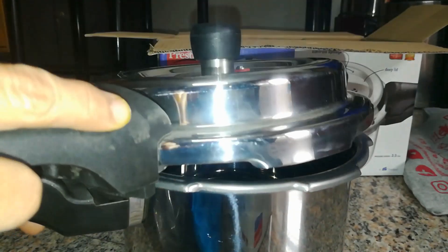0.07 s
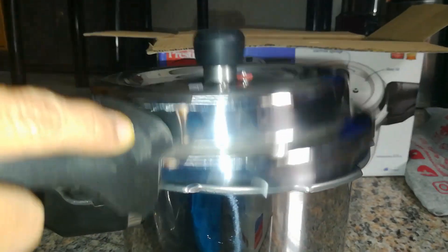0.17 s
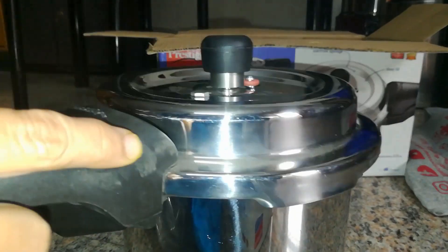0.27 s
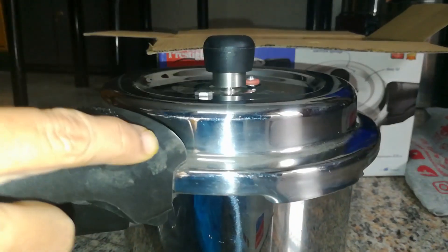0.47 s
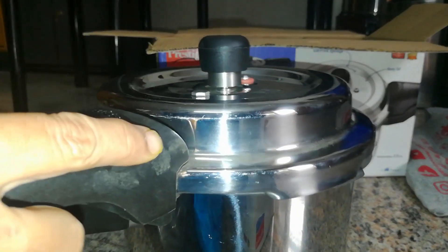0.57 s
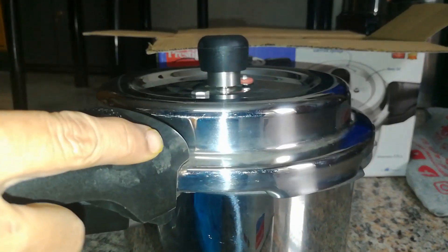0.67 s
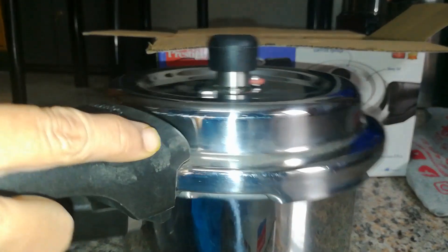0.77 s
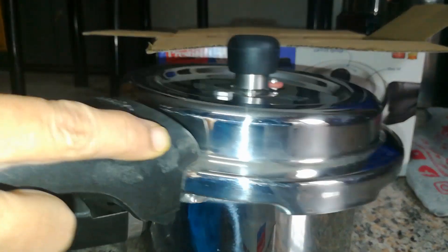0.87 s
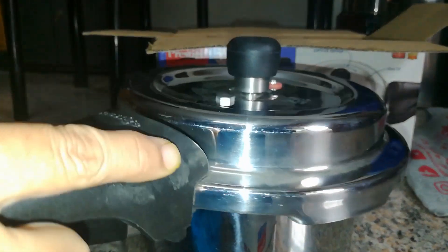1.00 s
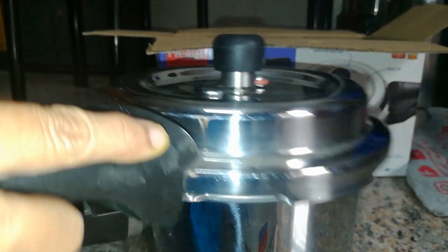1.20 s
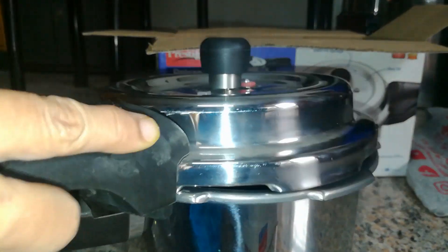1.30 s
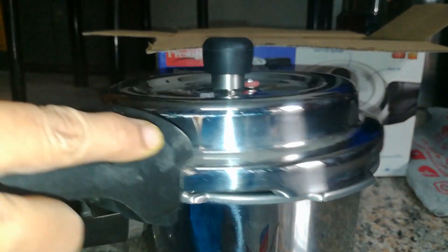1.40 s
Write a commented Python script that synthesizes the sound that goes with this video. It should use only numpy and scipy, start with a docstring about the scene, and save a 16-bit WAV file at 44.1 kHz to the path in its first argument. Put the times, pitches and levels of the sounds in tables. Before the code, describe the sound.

Loud metallic clank of a lid landing on a steel pot, followed by short scrapes and knocks

```python
"""A steel lid, ringing faintly from the start, is set down on a pressure cooker with one loud clank.
Held by its handle, it is then shifted: the rims scrape in runs of tiny slips, catch and knock.
Knocks ring the steel as clear tones in a crowd of close ones; they also make the hollow pot thump.
A small room adds a tail; coloured noise makes the low rumble of handling and the still air underneath."""
import sys
import numpy as np
from scipy import signal
from scipy.fft import rfft, irfft
from scipy.io import wavfile
from scipy.ndimage import uniform_filter1d

SR = 44100
rng = np.random.default_rng(int(sys.argv[2]) if len(sys.argv) > 2 else 0)


def to_wav(s):
    """Save 16-bit WAV."""
    ch = np.atleast_2d(s).T  # columns
    pcm = np.round(np.clip(ch, -1, 1) * 32767)  # PCM
    wavfile.write(sys.argv[1], SR, pcm.astype(np.int16))


N = 63945
RING_S = 0.7  # length worked out for every ring and thump
AGE = np.arange(int(RING_S * SR)) / SR  # seconds since the contact

# the crowd of close modes between the clear ones:
# (frequency [Hz], relative level per Hz [dB], left over right [dB])
CROWD_COLOUR = [(209, -24, -0.5), (383, -1.5, -15), (590, -10, 26.5), (740, -3.5, 6.5), (1160, -2, 3),
                (2180, 0, 1), (3300, 0, 3.5), (4730, 4.5, 8), (5940, 5.5, 9), (6100, 7, -2.5),
                (7300, 3, -2.5), (9000, 4.5, -8.5), (10440, 0.5, -9), (12560, -5.5, -10), (14300, -14, 0.5)]
# how alike the two ears hear it: (frequency [Hz], left-right correlation [0 to 1])
EAR_LIKENESS = [(100, .97), (250, .92), (700, .7), (1400, .55), (3000, .25), (8000, .1)]

THUMP_T60_S, THUMP_ATTACK_S = 0.24, 0.0045
LANDING_MODES_DB, SEATED_MODES_DB = 2.5, -2  # trims of the clear modes


def knocks(common):
    """Rim hits rim: knocks ring the steel and thump the pot, while bumps add only a thump."""
    # rim meets rim: (time [s], ring level [dB], brightness [dB per octave], thump level [dB],
    # thump pitch [Hz])
    rim_knocks = [(0.2126, -3.5, -2.4, -17, 292.7), (0.2166, -14.5, 10.5, -23, 228.5),
                  (0.242, -22.5, -4, -34, 308.5), (0.541, -33, -0.5, -65, 263),
                  (0.692, -42, -1, -32, 240.3), (0.773, -40.5, -2, -35, 284), (0.81, -21.5, -2.5, -31, 270),
                  (0.834, -24, -3.5, -47, 216), (0.963, -18.5, -0.5, -23.5, 235),
                  (1.016, -35.5, -3.5, -33, 234.5), (1.175, -18.5, -0.4, -28.5, 274.2),
                  (1.187, -25.5, -1, -33, 272), (1.216, -22, 1.8, -30.5, 218.5),
                  (1.258, -26.5, -2.5, -45, 220.3), (1.283, -31.5, -2.5, -34, 226)]
    # low thumps of lid on pot, alone or under a knock: (time [s], level [dB], pitch [Hz],
    # time to fall 60 dB [s])
    low_bumps = [(-0.01, -34.5, 230, 0.14), (0.345, -35.5, 287.6, 0.12), (0.424, -44.5, 284.2, 0.44),
                 (0.514, -32.5, 269, 0.14), (1.101, -38, 246, 0.086), (1.140, -27.5, 253.3, 0.1),
                 (1.257, -18, 218.4, 0.11)]
    seated_from_s = 0.5  # from here on the lid sits on the rim
    out = np.zeros((2, N))
    for s, ring_db, bright_db, thump_db, hz in rim_knocks:
        seated = s > seated_from_s
        modes_db = SEATED_MODES_DB if seated else LANDING_MODES_DB
        ring = steel_ring(common, bright_db, pot_modes(seated), modes_db)
        add(out, s, from_db(ring_db) * ring + from_db(thump_db) * thump(hz, THUMP_T60_S))
    for s, db, hz, t60 in low_bumps:
        add(out, s, from_db(db) * thump(hz, t60))
    return out


def steel_ring(common, bright_db, modes, modes_db):
    """One contact: a crack, a crowd of close modes with the room's tail, and the clear modes on top."""
    # how long the crowd rings: (frequency [Hz], time to fall 60 dB [s])
    crowd_decay = [(400, 0.11), (1500, 0.26), (4500, 0.19), (9000, 0.12), (15000, 0.18)]
    same_ring = 0.73  # share of the ring's power that is alike wherever the rim is struck
    crowd_db, mode_scatter_db = -3, 2.3
    crack_db, crack_s = 0.5, 0.013
    room_db, room_t60_s, room_dull_db = -14, 0.43, -0.6  # the tail is duller: dB per octave

    hz = np.fft.rfftfreq(len(AGE), 1 / SR)
    mixed = np.sqrt(same_ring) * common + np.sqrt(1 - same_ring) * crowd_of_modes()
    crowd = from_db(crowd_db) * rfft(mixed) * tilt(hz, bright_db)
    crowd = crowd * panned(at_hz(CROWD_COLOUR, hz, axis=2))
    crack = from_db(crack_db) * np.exp(-AGE / crack_s)
    room = from_db(room_db) * dying(room_t60_s)

    # overlapping bands, each dying at its own pace
    centres, t60s = np.transpose(crowd_decay)
    out = 0
    for band, centre, t60 in zip(np.eye(len(centres)), centres, t60s):
        share = np.interp(np.log(hz + 1), np.log(centres), band)
        dull_room = tilt(centre, room_dull_db) * room
        out = out + irfft(crowd * share, len(AGE)) * np.sqrt(crack ** 2 + dying(t60) ** 2 + dull_room ** 2)

    for mode_hz, db, t60 in modes:
        # the less alike the ears are, the further apart their phases
        apart = np.arccos(np.clip(at_hz(EAR_LIKENESS, mode_hz), 0, 1)) * rng.choice([-1, 1])
        phase = 2 * np.pi * rng.random() + np.array([[0], [apart]])
        scatter_db = mode_scatter_db * rng.standard_normal()
        gain = from_db(db + modes_db + scatter_db) * tilt(mode_hz, bright_db)
        sides = panned(at_hz(CROWD_COLOUR, mode_hz, axis=2))[:, None]
        out = out + gain * sides * dying(t60) * np.sin(2 * np.pi * mode_hz * AGE + phase)
    return out


def crowd_of_modes():
    """Countless close modes, bunched into stronger and weaker clusters."""
    cluster_db, cluster_hz = 5, 45.54  # how uneven the clusters are and how far apart
    hz = np.fft.rfftfreq(len(AGE), 1 / SR)
    steps = rng.standard_normal(len(hz))
    uneven = np.interp(hz / cluster_hz, np.arange(len(steps)), np.clip(steps, -2, 2))
    spectrum = rfft(noise(CROWD_COLOUR, len(AGE)))
    return rms_one(irfft(spectrum * from_db(cluster_db * uneven), len(AGE)))


def pot_modes(seated):
    """The clear modes of lid and pot as the lid lands, or once it sits on the rim."""
    # (frequency [Hz], relative level landing [dB], relative level seated [dB], time to fall 60 dB [s])
    clear_modes = [(715, -29, -28, .17), (1090, -29, -32, .35), (1290, -22, -19.5, .25),
                   (1616, -18, -15, .22), (1855, -20, -29, .2), (2358, -21.5, -28, .3),
                   (3000, -28, -23, .25), (3150, -20, -24, .22), (3230, -27, -32, .35),
                   (3402, -24, -28, .22), (3590, -30, -23, .22), (3738, -18, -19, .21),
                   (4510, -25, -19, .33), (4670, -18.5, -24, .23), (4828, -23, -17, .27),
                   (4890, -22, -19, .23), (5043, -19, -27, .2), (5557, -17, -18, .28),
                   (5590, -16.5, -21, .2), (5875, -22, -25, .27), (8088, -21, -25, .17),
                   (8955, -21, -26, .19), (9408, -21, -28, .18), (9726, -21, -27, .18),
                   (10137, -21, -28, .2), (11840, -24, -30, .2)]
    return [(hz, seated_db if seated else landing_db, t60)
            for hz, landing_db, seated_db, t60 in clear_modes]


def tilt(hz, bright_db):
    """Each contact has its own brightness: dB per octave around 5 kHz, constant below 500 Hz."""
    return from_db(bright_db * np.log2(np.maximum(hz, 500) / 5000))


def thump(hz, t60):
    """The lid bounces on the air and gasket of the pot: a short low note."""
    hollow_db = -12.5  # against the note, in a thump of the usual length
    note = np.sqrt(2) * np.sin(2 * np.pi * hz * AGE) * dying(t60)
    body = note + from_db(hollow_db) * t60 / THUMP_T60_S * hollow()
    attack = 1 - np.exp(-AGE / THUMP_ATTACK_S)
    return body * attack * panned(db=1.2)[:, None]


def hollow():
    """The dense low resonances of pot and room: dying low noise."""
    # (frequency [Hz], relative level [dB])
    hollow_colour = [(60, -27), (150, -19.5), (205, 11), (300, 9.5), (360, -28), (900, -51)]
    return noise(hollow_colour, len(AGE)) * dying(t60=0.51)


def scrape(count=3):
    """Rim slips on rim in a run of uneven clicks; each spot of the rim rings the steel in its own way."""
    # how hard the rims rub: (time [s], level [dB])
    rubbing = [(0.5, -56.5), (0.549, -39.5), (0.57, -90), (0.69, -65.5), (0.74, -42), (0.79, -28.5),
               (0.825, -23), (0.85, -29), (0.868, -60), (0.932, -37), (0.955, -58), (1.03, -41),
               (1.12, -49), (1.165, -31), (1.19, -28.5), (1.225, -27.5), (1.27, -42), (1.37, -50),
               (1.41, -54), (1.435, -43)]
    slips_per_s, slip_spread_db = 420, 2.2
    bright_db, hollow_db, modes_db = -1.7, -17.5, -0.5
    spot_s = 0.022  # the contact moves on to the next spot this often, round and round

    sizes = from_db(slip_spread_db * np.minimum(rng.exponential(1, N), 3)) * rng.choice([-1, 1], N)
    happens = rng.random(N) < slips_per_s / SR
    slips = rms_one(sizes * happens) * level(rubbing)
    spot = (np.arange(N) / SR // spot_s) % count
    out = 0
    for k in range(count):
        ring = steel_ring(crowd_of_modes(), bright_db, pot_modes(seated=True), modes_db)
        body = rms_one(ring + from_db(hollow_db) * hollow()) / np.sqrt(len(AGE))
        # every slip at this spot sets off its ring
        out = out + signal.fftconvolve((slips * (spot == k))[None], body, axes=1)[:, :N]
    return out


def lifted_lid(common):
    """Held clear of the pot, the lid rings on from an earlier touch with notes of its own."""
    # (frequency [Hz], relative level [dB])
    lid_notes = [(1077, -24), (1312, -17), (2880, -22), (3005, -19), (3228, -21), (4247, -19)]
    start_s, lid_db, t60_s = -0.046, -7, 0.29
    out = np.zeros((2, N))
    modes = [(hz, db, t60_s) for hz, db in lid_notes]
    add(out, start_s, from_db(lid_db) * steel_ring(common, 0, modes, LANDING_MODES_DB))
    return out


def cut_gaps(x):
    """The pot radiates little between its families of modes: a notch filter for each gap."""
    # (centre [Hz], change in level [dB], width [Hz])
    mode_gaps = [(464, -7.5, 220), (966, -11, 224), (2633, -21, 125), (4030, -9, 78), (6210, -9, 250)]
    for hz, db, width_hz in mode_gaps:
        half = np.pi * width_hz / SR
        middle = -2 * np.cos(2 * np.pi * hz / SR)
        depth = from_db(db / 2)
        top = [1 + half * depth, middle, 1 - half * depth]
        bottom = [1 + half / depth, middle, 1 - half / depth]
        x = signal.lfilter(top, bottom, x)
    return x


def handling_rumble():
    """Handling makes a soft low rumble: deep noise that swells and sinks."""
    # how strong it is: (time [s], level [dB])
    rumble_level = [(0, -55), (0.45, -75.5), (0.478, -54.5), (0.54, -54), (0.578, -38.5), (0.68, -52.5),
                    (0.78, -66), (1.26, -54), (1.32, -83), (1.395, -48)]
    # (frequency [Hz], relative level [dB])
    rumble_colour = [(20, -13.5), (50, -5), (110, -15.5), (155, -3.5), (220, -55.5), (2000, -72)]
    return level(rumble_level) * noise(rumble_colour, N)


def room_air():
    """Still room air: faint steady noise, strongest in the low range."""
    # (frequency [Hz], relative level [dB])
    air_colour = [(30, -25.5), (250, -3.5), (600, -19), (4000, -22), (15000, -54)]
    return from_db(-62) * noise(air_colour, N)


def noise(spectrum, size):
    """Stereo noise of a given colour, alike in both ears in the bass; rms 1."""
    hz = np.fft.rfftfreq(size, 1 / SR)
    alike = np.clip(at_hz(EAR_LIKENESS, hz), 0, 1)
    mid, side = np.exp(2j * np.pi * rng.random((2, len(hz))))
    both = np.sqrt(1 + alike) * mid + np.sqrt(1 - alike) * side * [[1], [-1]]
    return rms_one(irfft(both * from_db(at_hz(spectrum, hz)), size))


def from_db(db):
    """Decibels to gain."""
    return 10 ** (np.asarray(db) / 20)


def at_hz(points, hz, axis=1):
    """Read a column of a table on a log-frequency axis."""
    points = np.array(points, float)
    return np.interp(np.log(hz + 1), np.log(points[:, 0]), points[:, axis])


def level(curve):
    """A dB curve as a gain in time."""
    return from_db(np.interp(np.arange(N) / SR, *np.transpose(curve)))


def panned(db):
    """Left and right gains of constant power, the left louder by this many dB."""
    gains = from_db(np.array([db, -db]) / 2)
    return gains / np.sqrt(np.mean(gains ** 2, axis=0))


def dying(t60):
    """Exponential decay that falls 60 dB in t60 seconds."""
    return np.exp(-np.log(1000) * AGE / t60)


def rms_one(x):
    """Scale to unit rms (average strength)."""
    return x / np.sqrt(np.mean(x ** 2) + 1e-20)


def add(out, s, sound):
    """Mix a sound in at a time; one begun before zero is already ringing."""
    start = int(s * SR)
    sound, start = sound[:, max(-start, 0):], max(start, 0)
    out[:, start:start + sound.shape[-1]] += sound[:, :N - start]


def scene():
    """Knocks, scraping and the ringing lid over handling rumble and still room air."""
    common = crowd_of_modes()  # the part of the ring that knocks and lifted lid share
    pot = cut_gaps(knocks(common) + scrape() + lifted_lid(common))
    return pot + handling_rumble() + room_air()


def record(dry):
    """A noise suppressor shuts the treble when it is faint; the peaks are clipped; the top is cut."""
    gate_db, gate_above_hz, gate_s = -59, 420, 0.015  # treble at gate_db is halved
    overload, cutoff_hz = 0.88, 15900
    highpass = signal.butter(2, gate_above_hz, "high", fs=SR, output="sos")
    treble = signal.sosfiltfilt(highpass, dry)
    power = uniform_filter1d(np.mean(treble ** 2, axis=0), int(gate_s * SR))
    gated = dry - treble / (1 + power / from_db(gate_db) ** 2)
    lowpass = signal.cheby2(20, 60, cutoff_hz, fs=SR, output="sos")
    return signal.sosfilt(lowpass, np.clip(gated, -overload, overload))


dry = scene()
out = record(dry)
to_wav(out)
```